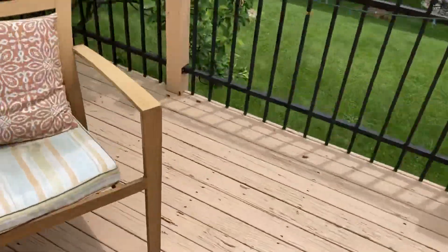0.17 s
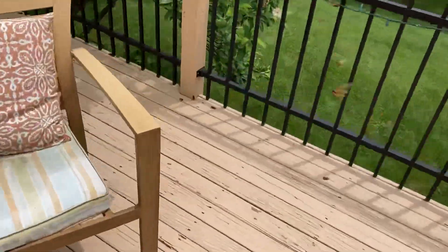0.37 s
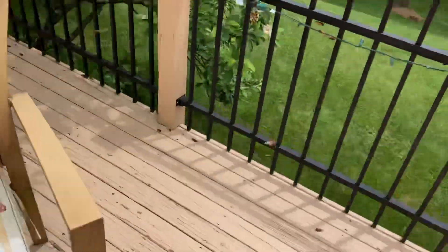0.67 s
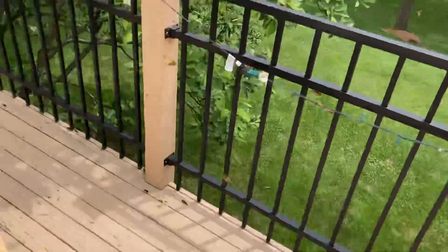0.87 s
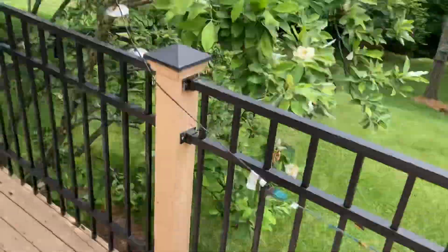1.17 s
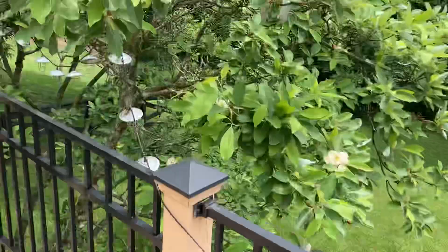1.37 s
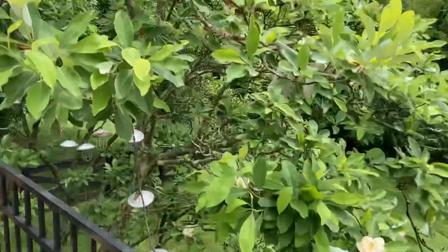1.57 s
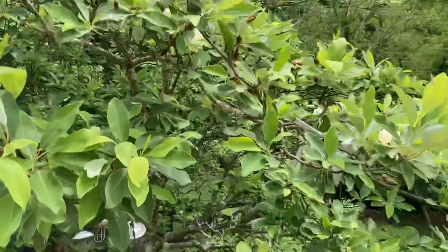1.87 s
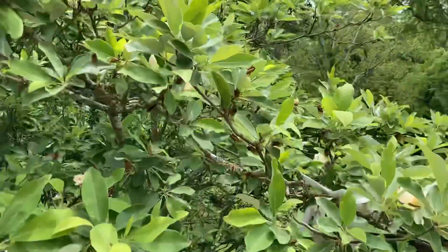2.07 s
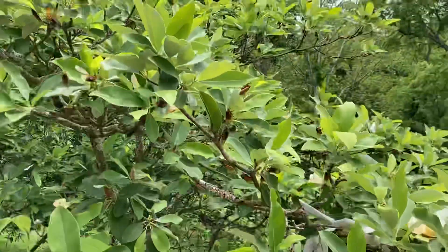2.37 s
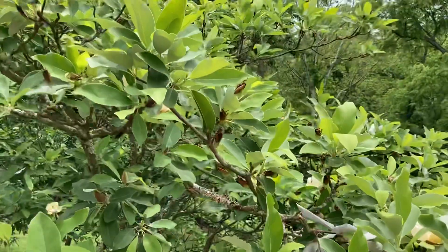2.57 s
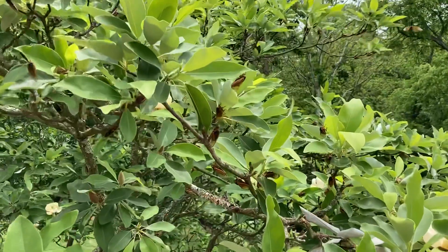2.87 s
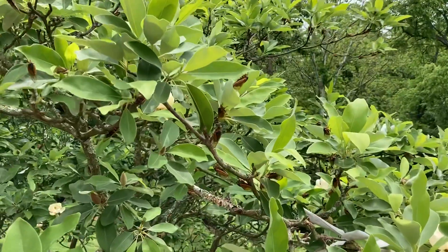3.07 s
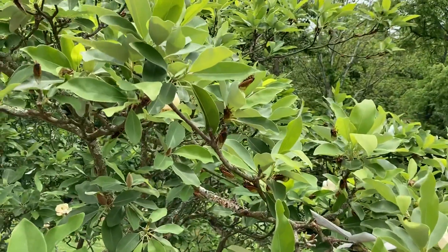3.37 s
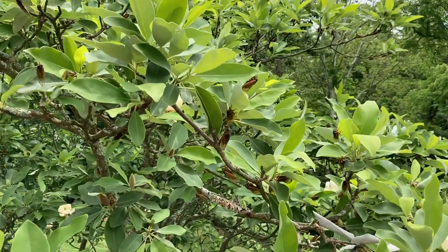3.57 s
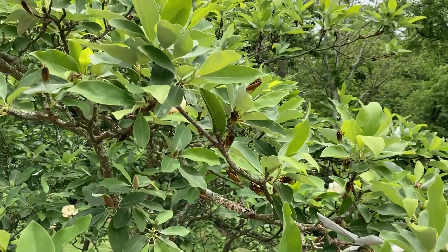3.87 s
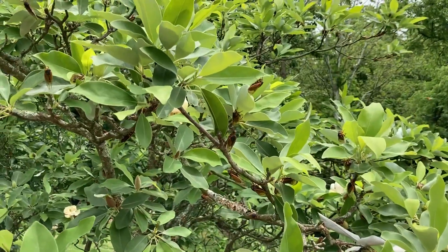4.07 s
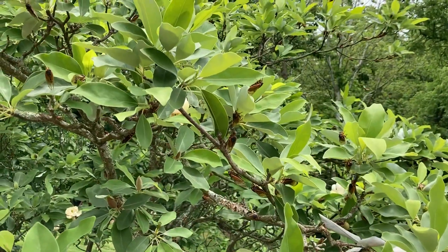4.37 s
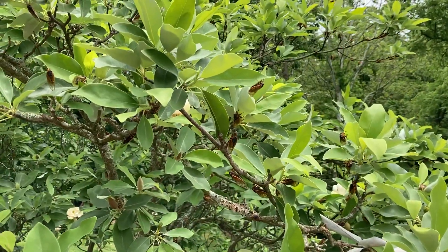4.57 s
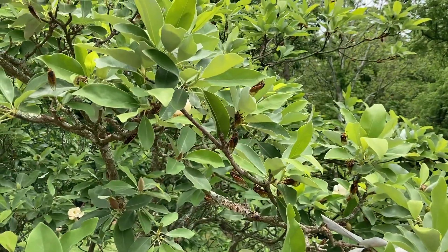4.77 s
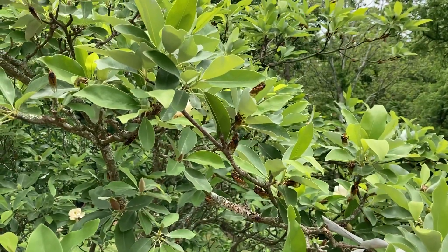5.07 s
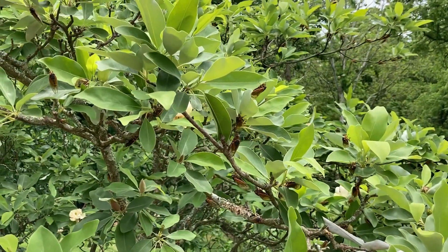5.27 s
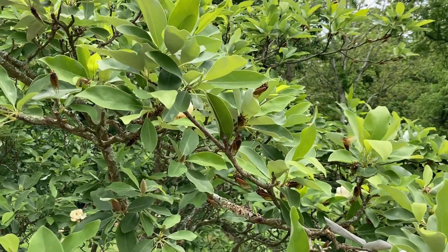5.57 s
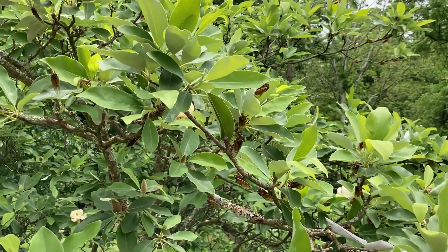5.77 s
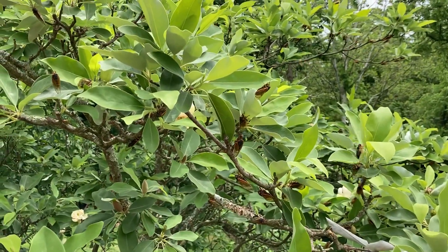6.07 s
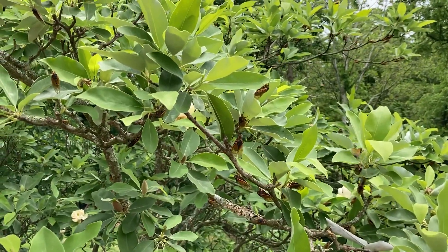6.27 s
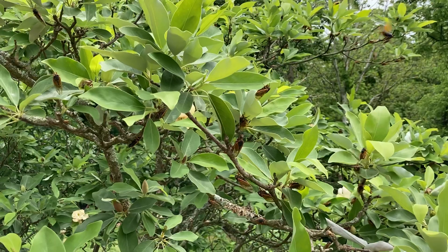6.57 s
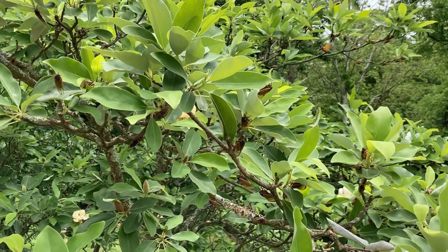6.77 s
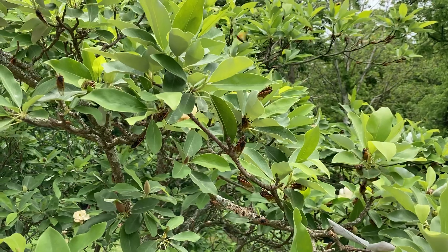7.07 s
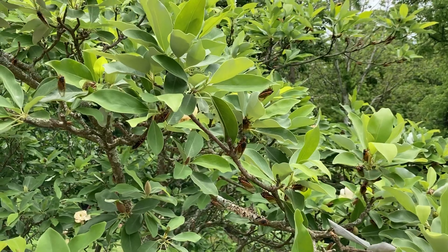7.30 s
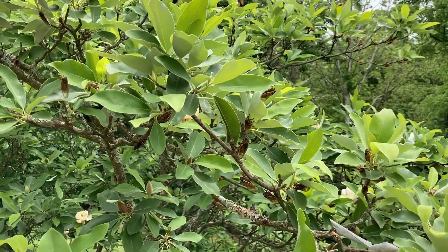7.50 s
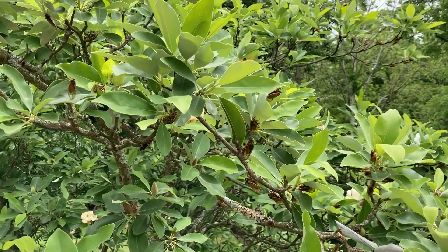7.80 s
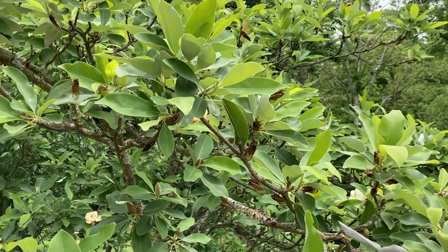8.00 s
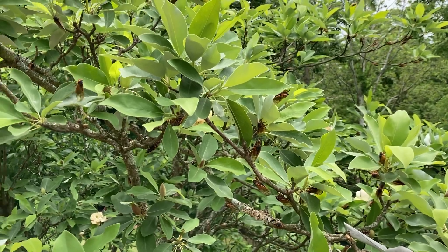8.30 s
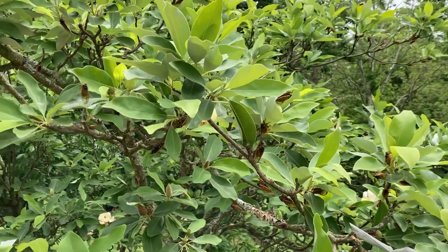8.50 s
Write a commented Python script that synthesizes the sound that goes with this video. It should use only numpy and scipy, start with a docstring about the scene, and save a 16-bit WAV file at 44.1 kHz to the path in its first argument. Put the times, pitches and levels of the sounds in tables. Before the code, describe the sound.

Cicadas outdoors rise to a dense, shrill buzz, ebb to ticking and slowly swell again over a faint low murmur.

```python
"""Cicada chorus from a wooden deck

Periodical cicadas in garden trees buckle their tymbals, and each click rings the hollow abdomen.
They tick, swell together into a buzz and fall away, then tick again; a few sit close by.
A second kind drones far off, over a low outdoor murmur and the hum of a distant motor.
A few soft steps knock the boards and make the deck boom."""
import sys
import numpy as np
from scipy import signal
from scipy.fft import rfft, irfft
from scipy.io import wavfile
from scipy.ndimage import uniform_filter1d

SR = 44100
rng = np.random.default_rng(int(sys.argv[2]) if len(sys.argv) > 2 else 0)


def to_wav(s):
    """Save 16-bit WAV."""
    ch = np.atleast_2d(s).T  # columns
    pcm = np.round(np.clip(ch, -1, 1) * 32767)  # PCM
    wavfile.write(sys.argv[1], SR, pcm.astype(np.int16))


N = 381024
TIME = np.arange(N) / SR
BREAK_AT_S = 4.195  # the crest of the chorus ends here


def chorus():
    """Incoherent summation: many voices merge into noise, out of which the near insects stand."""
    lull_db, crest_db, shimmer_db = -32, -19, 0.25
    effort = chorus_effort(TIME)
    active, lift_db, sizzle_db = bouts()
    level_db = lull_db + (crest_db - lull_db) * effort + lift_db
    ticking_db = -12 - 7 * effort + 2.5 * active  # relative to the far voices
    far = rng.standard_normal((2, N))
    near = gain_of(-8) * buzzers(count=10, rate_hz=170, spread=0.5, jitter=0.05, phrase_db=1.5)
    ticks = gain_of(ticking_db) * tickers(count=2, ticks_per_s=18, decay_s=0.0089, rib_hz=621.4)
    song = heard_colour(stereo(far + near + ticks), sizzle_db)
    # so many voices overlap that their sum holds steady from moment to moment
    steady = song / np.sqrt(uniform_filter1d(np.mean(song ** 2, axis=0), size=7000))
    return gain_of(level_db + shimmer_db * wander(9)) * steady


def chorus_effort(t):
    """Synchrony: shared effort (0-1) cycles through a build, a surge, a crest, a drop and an ebb."""
    period_s, surge_s, hold_s, drop_s, ebb_s = 7.15, 0.61, 1.214, 0.088, 1.015
    since_break, to_crest = (t - BREAK_AT_S) % period_s, period_s - hold_s
    drop = np.clip(1 - since_break / drop_s, 0, 1)
    ebb = np.clip(1 - since_break / ebb_s, 0, 1) ** 1.05
    build = np.clip((since_break - ebb_s) / (to_crest - ebb_s), 0, 1)
    surge = np.clip(1 - (to_crest - since_break) / surge_s, 0, 1)
    return 0.15 * drop + 0.85 * ebb + 0.85 * build + 0.15 * surge


def bouts():
    """Amplitude modulation by bouts of the nearer cicadas: activity (0-1), lift and sizzle in dB."""
    # Each row: start and length in seconds, lift of the whole song in dB, top-octave sizzle in dB.
    near_bouts = [(.4, 1.2, -0.4, 0), (2.863, 0.4, 2.2, -0.5), (3.4, 0.83, 0.05, 2.5),
                  (5.71, 1.45, 0.8, 2.5), (6.5, 2.8, -1.4, 1)]
    active = np.array([swell(start, length, edge_s=0.33) for start, length, _, _ in near_bouts])
    _, _, lift_db, sizzle_db = np.transpose(near_bouts)
    return active.max(0), lift_db @ active, sizzle_db @ active


def buzzers(count, rate_hz, spread, jitter, phrase_db):
    """Impulse trains: tymbals buckle so fast that their slightly uneven clicks fuse into a buzz."""
    out = np.zeros((2, N))
    for place in np.linspace(-1, 1, count):
        rate = rate_hz * np.exp(spread * rng.uniform(-1, 1) + 0.03 * wander(2) + jitter * wander(150))
        pulses = clicks(rate) * gain_of(phrase_db * np.tanh(wander(2.2)))
        out += abdomen(pulses, body_hz=6200 * np.exp(0.39 * place), width_hz=1220,
                       leaves_db=-2.5, t60=0.081)
    return unit_rms(out)


def tickers(count, ticks_per_s, decay_s, rib_hz):
    """Pulse bursts: a tick is a decaying run of tymbal clicks, on each insect's own loose beat."""
    out = np.zeros((2, N))
    for place in np.linspace(-1, 1, count):
        beat_hz = ticks_per_s * np.exp(0.15 * place + 0.15 * wander(7))
        age = ((np.cumsum(beat_hz) / SR + rng.random()) % 1) / beat_hz
        burst = np.exp(-age / decay_s) * gain_of(2.7 * np.tanh(wander(6.4)))
        pulses = clicks(rib_hz * np.exp(0.2 * wander(200))) * burst
        out += abdomen(pulses, body_hz=5800 * np.exp(0.22 * place), width_hz=3900,
                       leaves_db=-3.0, t60=0.037)
    return unit_rms(out)


def abdomen(pulses, body_hz, width_hz, leaves_db, t60):
    """Cavity resonance: clicks ring the abdomen; leaves scatter the sound along two different paths."""
    t = np.arange(6000) / SR
    rung = resonate(pulses, body_hz * np.exp(0.0075 * wander(1.91)), width_hz)
    heard = []
    for first, late in rng.standard_normal((2, 2, len(t))):
        direct = unit_rms(first * np.exp(-t / 0.00028))
        scattered = gain_of(leaves_db) * unit_rms(late * gain_of(-60 * t / t60))
        heard.append(unit_rms(signal.oaconvolve(rung, direct + scattered)[:N]))
    return np.array(heard)


def heard_colour(voices, sizzle_db):
    """Spectral envelope: the chorus's colour as heard."""
    # The colour heard at rest, at full effort and in the ebb, when the flanks outlast the 6 kHz core.
    # Each row: frequency in Hz, relative spectral level in dB.
    soft_spectrum = [(2000, -36), (2600, -32), (3100, -25.5), (3700, -12.5), (4250, -5.5), (4800, -9),
                     (5400, -2.5), (5900, 0.5), (6400, -1), (6900, -8.5), (7500, -14.5), (8200, -13.5),
                     (8900, -37), (10000, -20.5), (12400, -24.5), (13800, -38), (14800, -40)]
    loud_spectrum = [(2000, -42), (2600, -37), (3100, -27), (3700, -14.5), (4250, -9), (4800, -9.5),
                     (5400, -6), (5900, -1), (6400, -1), (6900, -6), (7500, -14.5), (8200, -15.5),
                     (8900, -30.5), (10000, -20.5), (12400, -25.5), (13800, -39), (14800, -43.5)]
    ebb_spectrum = [(2000, -40.5), (2600, -32), (3100, -23), (3700, -10.0), (4250, -7), (4800, -8.5),
                    (5400, -4.5), (5900, -0.5), (6400, -1), (6900, -4.5), (7500, -12), (8200, -13),
                    (8900, -33), (10000, -20.5), (12400, -24), (13800, -39), (14800, -45)]
    bright_from = 0.17  # effort above which the song brightens
    hz, t, frames = signal.stft(voices, SR, nperseg=1024, noverlap=768)
    hz = hz[:, None]
    mean_power = uniform_filter1d(np.mean(abs(frames) ** 2, axis=(0, 2)), size=9)
    whitened = frames / np.sqrt(mean_power)[:, None]
    bright = np.clip((chorus_effort(t) - bright_from) / (1 - bright_from), 0, 1)
    ebbing = np.interp(t, TIME, swell(BREAK_AT_S, length_s=1.53, edge_s=0.3))
    colour_db = spectrum(soft_spectrum, hz) * (1 - bright) + spectrum(loud_spectrum, hz) * bright
    colour_db = colour_db * (1 - ebbing) + spectrum(ebb_spectrum, hz) * ebbing
    top_octave = np.clip((hz - 7400) / 2500, 0, 1)
    colour_db += top_octave * (np.interp(t, TIME, sizzle_db) - 1.5)
    colour_db += 2.3 * patches(colour_db.shape, bins=2, frames=16)  # single voices come and go
    colour_db += 0.5 * patches(colour_db.shape, bins=12, frames=8)  # short rasps overlap in a shimmer
    low_cut = 1 / np.sqrt(1 + (1750 / (hz + 1)) ** 8)  # small bodies radiate nothing low
    coloured = whitened * low_cut * gain_of(colour_db)
    return signal.istft(coloured, SR, nperseg=1024, noverlap=768)[1][:, :N]


def steps():
    """Impact excitation: a board knocks dully with a slight scuff, then the whole deck booms."""
    # Each row: start in seconds, boom level in dB and pitch in Hz, knock level in dB and pitch in Hz.
    footfalls = [(0.493, -44, 60, -47, 209), (.668, -39.5, 58, -46.5, 105), (5.33, -45, 73, -64, 125),
                 (7.135, -51, 53, -54, 110)]
    knock_lead_s, knock_rise_s = 0.011, 0.012
    boom_rise_s, boom_hold_s, boom_decay_s = 0.014, 0.05, 0.012
    out = np.zeros(N)
    for start, boom_db, boom_hz, knock_db, knock_hz in footfalls:
        age, knock_age = np.maximum(TIME - start, 0), np.maximum(TIME - start + knock_lead_s, 0)
        scuff = unit_rms(resonate(rng.standard_normal(N), knock_hz, width_hz=110))
        knock = np.sin(2 * np.pi * knock_hz * knock_age) + gain_of(-2.5) * scuff
        out += gain_of(knock_db) * knock * knock_age / knock_rise_s * np.exp(1 - knock_age / knock_rise_s)
        boom = np.minimum(age / boom_rise_s, 1) * np.exp(-np.maximum(age - boom_hold_s, 0) / boom_decay_s)
        out += gain_of(boom_db) * boom * np.sin(2 * np.pi * boom_hz * age)
    return out


def murmur():
    """Broadband noise: the outdoor background, with most of its power at low frequencies."""
    # Each row: time in seconds, level in dB before the lift.
    levels = [(0.2, -58), (3.09, -57), (4.49, -64.5), (5.59, -61.5), (8.3, -60)]
    # Each row: frequency in Hz, relative spectral level in dB.
    murmur_spectrum = [(13, -55), (22, -30), (36, -12), (55, -2.5), (171, -9.5), (235, -10), (317, -15),
                       (419, -14), (565, -18), (1090, -16), (1310, -13), (1520, -26), (1900, -30.5),
                       (2470, -30), (4180, -120)]
    lift_db = 7.0
    colour = gain_of(spectrum(murmur_spectrum, np.fft.rfftfreq(N, 1 / SR)))
    noise = unit_rms(irfft(rfft(rng.standard_normal((2, N))) * colour, N))
    return gain_of(curve(levels) + lift_db) * noise


def far_cicadas():
    """Narrowband noise: the low notes of many far cicadas merge into one fuzzy drone."""
    # Each row: time in seconds, level of the drone in dB.
    levels = [(0.2, -58), (.7, -53.5), (1.22, -61), (1.72, -55), (3.1, -58.5), (4.35, -64.5), (5.2, -63.5),
              (5.6, -60), (7.6, -60), (8.3, -56.5), (8.6, -61.5)]
    pitch_hz = 1310 + 22 * wander(6)
    band = resonate(rng.standard_normal((2, N)), pitch_hz, width_hz=88)
    drone = unit_rms(resonate(band, pitch_hz, width_hz=160))
    return gain_of(curve(levels) + 1.3 * wander(19)) * drone


def motor():
    """Modulated tones: a throbbing hum and a thin upper tone swell once; late on, the hum fades."""
    # The hum follows the motor's speed. Each row: time in seconds, pitch in Hz.
    pitches = [(1, 70.7), (3.2, 71), (3.8, 75.2), (6.5, 74.2)]
    fade_at_s, fade_db_per_s = 6.7, 3
    effort = swell(start_s=4.95, length_s=2.1, edge_s=0.7)
    hum_db = -61.5 + 8.5 * effort - fade_db_per_s * np.maximum(TIME - fade_at_s, 0)
    hum = unit_rms(tone(curve(pitches) + 1.5 * wander(18)) * gain_of(5.5 * np.tanh(wander(12))))
    upper = unit_rms(tone(240 + 1.24 * wander(12)) * gain_of(2.6 * wander(7)))
    return gain_of(hum_db) * hum + gain_of(-72 + 4.5 * effort) * upper


def stereo(pair):
    """Partial correlation: two unrelated signals become partly alike, the left one slightly late."""
    # How alike the left and right channels sound; the treble is nearly the same in both.
    # Each row: frequency in Hz, likeness from 0 to 1.
    likeness = [(60, 0.97), (250, 0.86), (600, 0.4), (1300, 0.45), (2500, 0.1), (4800, 0.1), (6100, 0.24),
                (7200, .85), (7900, 0.55), (9000, .92), (13000, 0.88), (15000, .3)]
    # Each row: frequency in Hz, left level minus right level in dB.
    balance = [(100, -0.5), (900, -.5), (3400, 1), (4500, 0.2), (5700, -1.1), (7100, -0.5), (10000, -0.3)]
    # Each row: frequency in Hz, delay of the left channel in samples.
    left_delay = [(6000, 12), (8000, 12.3), (9700, 12.2), (11300, 11.7), (12500, 11.5)]
    hz, (a, b) = np.fft.rfftfreq(N, 1 / SR), rfft(pair)
    same = np.clip(spectrum(likeness, hz), 0, 1)
    shared, apart = a * np.sqrt((1 + same) / 2), b * np.sqrt((1 - same) / 2)
    lean = gain_of(spectrum(balance, hz) / 2)
    lag = np.exp(-2j * np.pi * hz * spectrum(left_delay, hz) / SR)
    return irfft(np.array([(shared + apart) * lean * lag, (shared - apart) / lean]), N)


def resonate(x, hz, width_hz):
    """A damped resonance of gain 1 whose centre follows hz."""
    turn = np.exp(2j * np.pi * np.cumsum(hz * np.ones(N)) / SR)
    pole = np.exp(-np.pi * width_hz / SR)
    return 2 * (turn * signal.lfilter([1 - pole], [1, -pole], x / turn)).real


def tone(hz):
    """A sine whose phase is the integral of its frequency."""
    return np.sin(2 * np.pi * np.cumsum(hz) / SR)


def clicks(rate_hz):
    """One impulse at each whole turn of the integrated rate."""
    return np.diff(np.floor(np.cumsum(rate_hz) / SR + rng.random()), prepend=0)


def wander(per_s):
    """Random drift of rms 1, through per_s values a second."""
    knots = rng.standard_normal(4096)
    return unit_rms(np.interp(TIME * per_s, np.arange(len(knots)), knots))


def patches(shape, bins, frames):
    """Noise smoothed over frequency and time into blotches of rms 1."""
    return unit_rms(uniform_filter1d(uniform_filter1d(rng.standard_normal(shape), bins, 0), frames, 1))


def swell(start_s, length_s, edge_s):
    """An envelope that ramps up, holds if it reaches 1, and ramps back to 0."""
    return np.clip(np.minimum(TIME - start_s, start_s + length_s - TIME) / edge_s, 0, 1)


def curve(points):
    """Interpolates (time, value) rows at every sample."""
    return np.interp(TIME, *np.transpose(points))


def spectrum(points, hz):
    """Interpolates (frequency, value) rows on a logarithmic axis."""
    point_hz, value = np.transpose(points)
    return np.interp(np.log(hz + 1), np.log(point_hz + 1), value)


def gain_of(db):
    """Decibels to amplitude."""
    return 10 ** (np.asarray(db) / 20)


def unit_rms(x):
    """Scales to rms 1."""
    return x / np.sqrt(np.mean(x ** 2) + 1e-20)


def scene():
    """Superposition: all sources add in the two channels."""
    return chorus() + stereo(murmur() + far_cicadas()) + motor() + steps()


def record(dry):
    """Band limiting: the microphones shed the deepest bass, and a low-pass cuts the highest treble."""
    bass_cut = signal.butter(3, 38, "highpass", fs=SR, output="sos")
    treble_cut = signal.firwin(511, 15800, window=("kaiser", 9), fs=SR)
    return signal.oaconvolve(signal.sosfilt(bass_cut, dry), treble_cut[None], "same")


dry = scene()
out = record(dry)
to_wav(out)
```